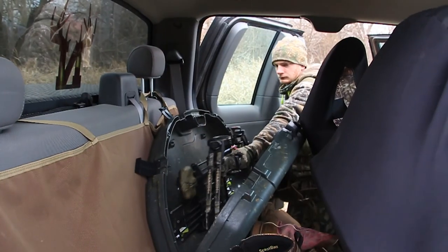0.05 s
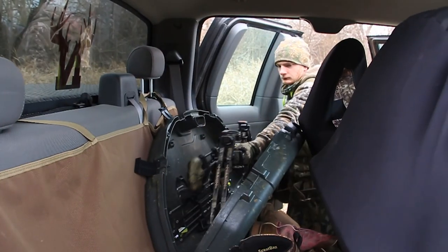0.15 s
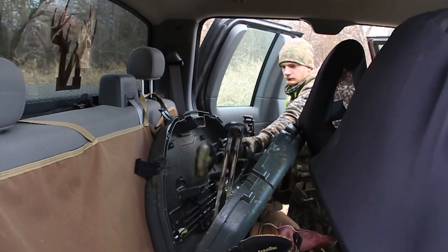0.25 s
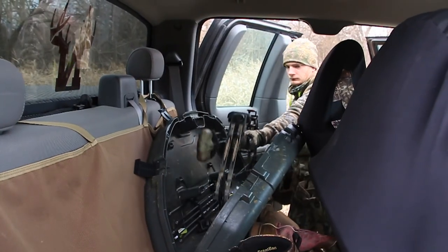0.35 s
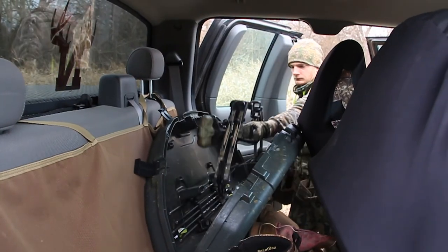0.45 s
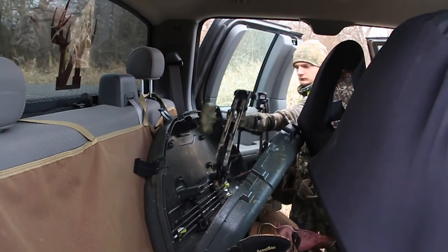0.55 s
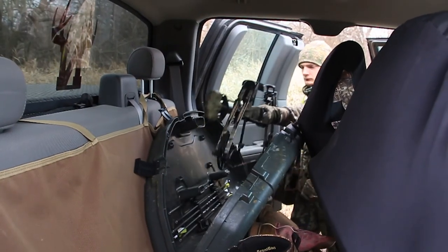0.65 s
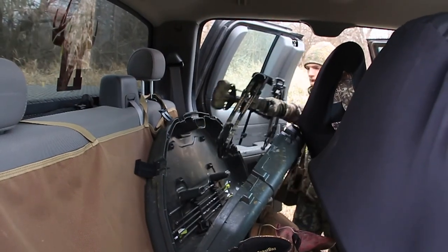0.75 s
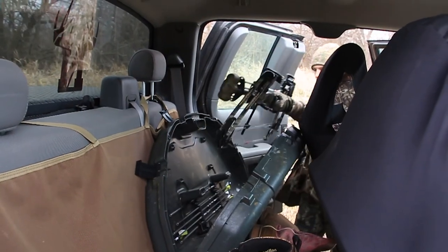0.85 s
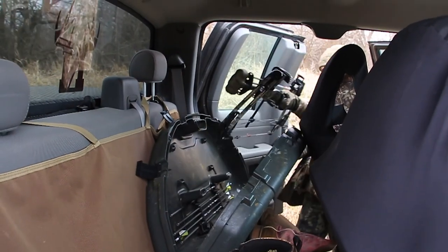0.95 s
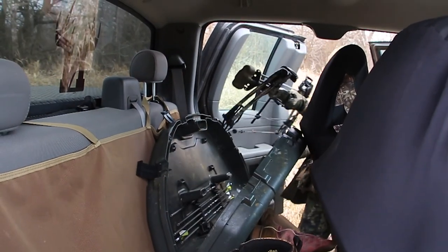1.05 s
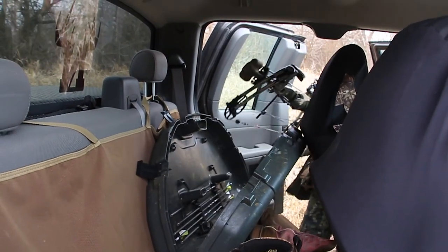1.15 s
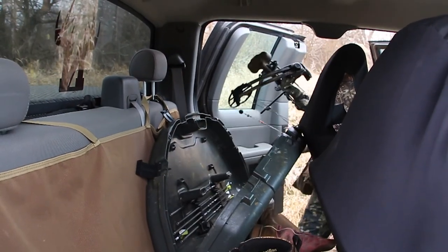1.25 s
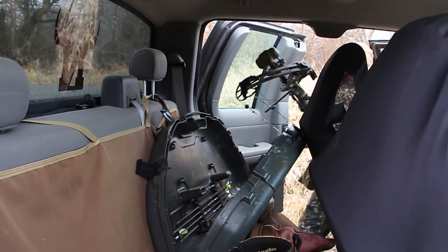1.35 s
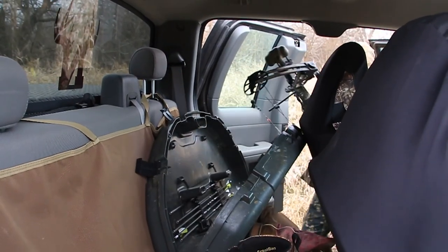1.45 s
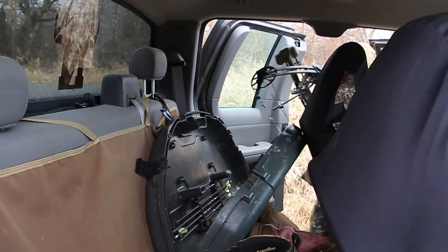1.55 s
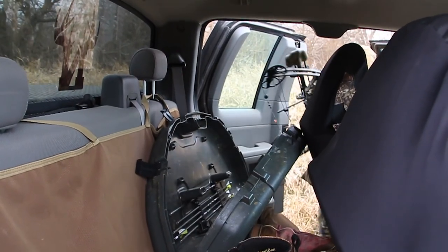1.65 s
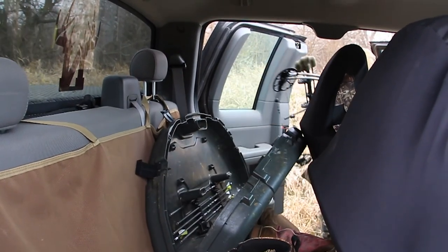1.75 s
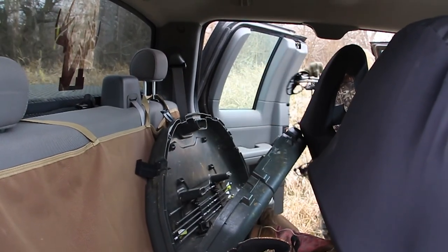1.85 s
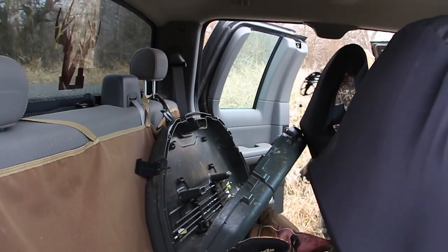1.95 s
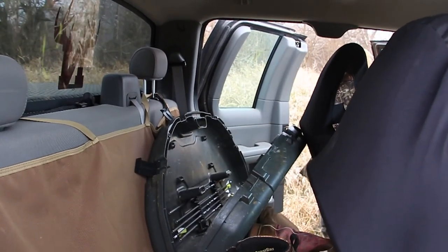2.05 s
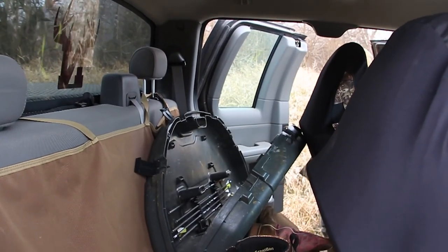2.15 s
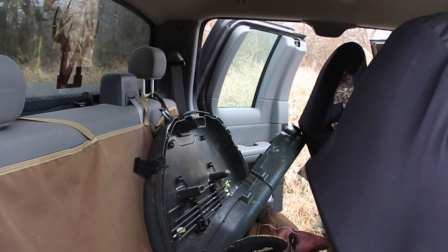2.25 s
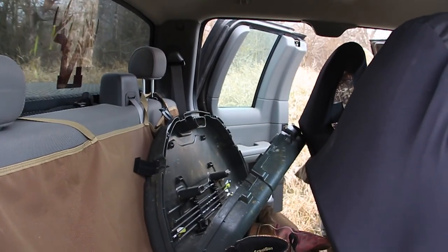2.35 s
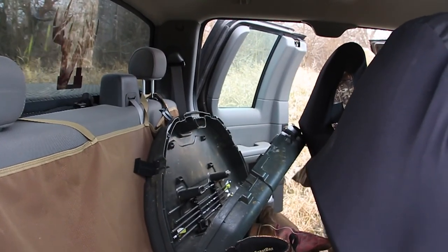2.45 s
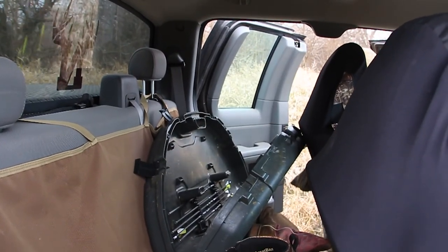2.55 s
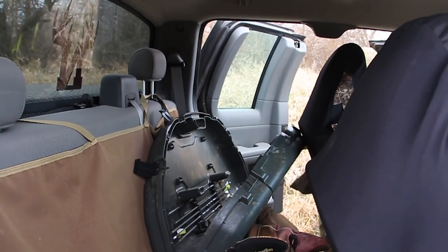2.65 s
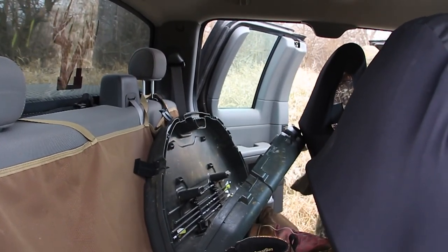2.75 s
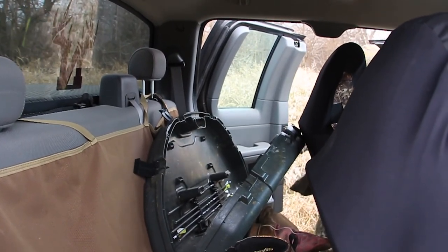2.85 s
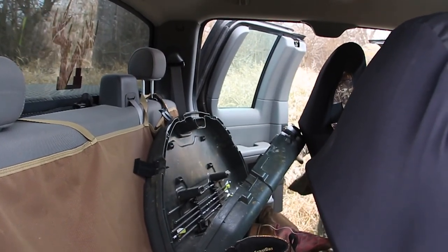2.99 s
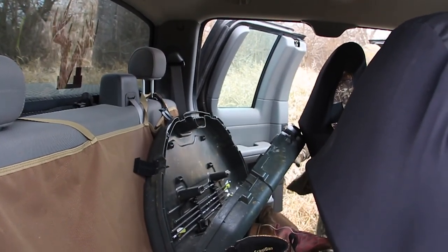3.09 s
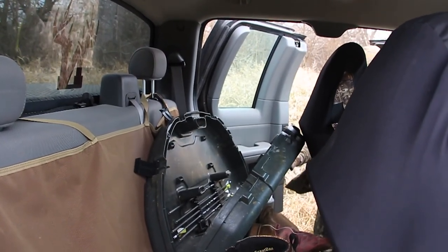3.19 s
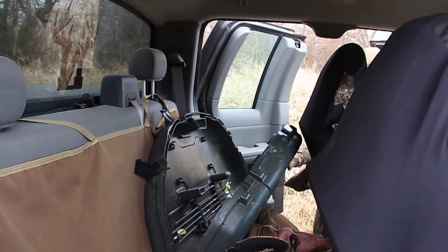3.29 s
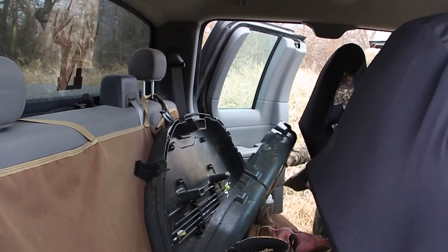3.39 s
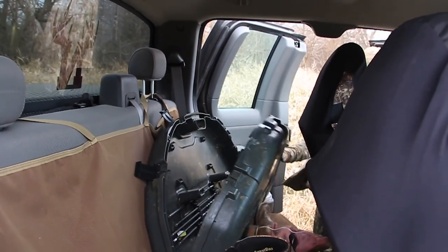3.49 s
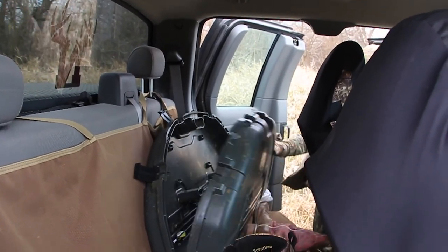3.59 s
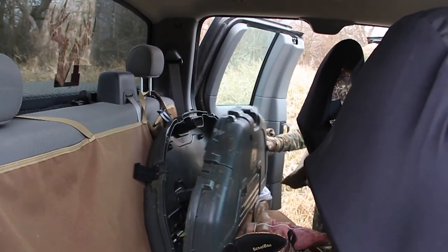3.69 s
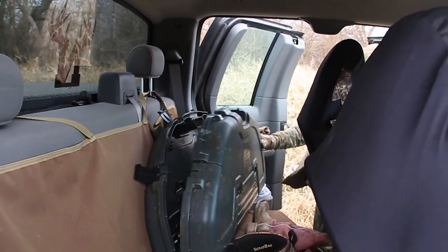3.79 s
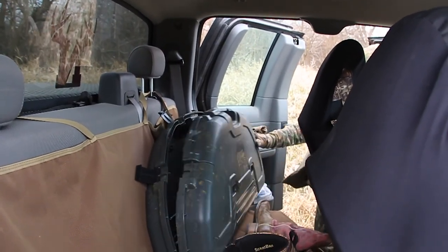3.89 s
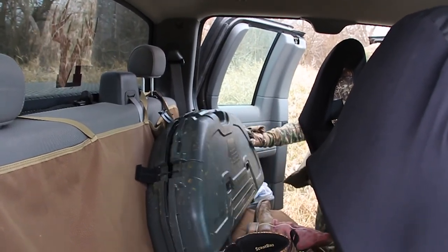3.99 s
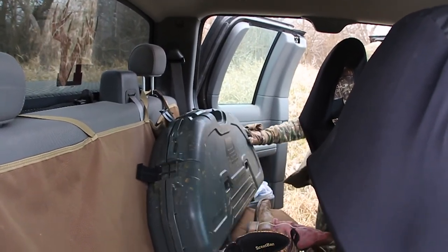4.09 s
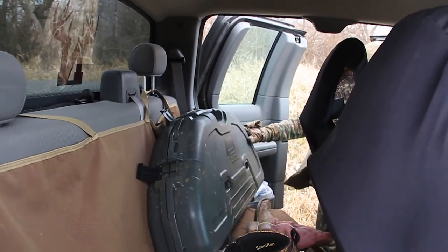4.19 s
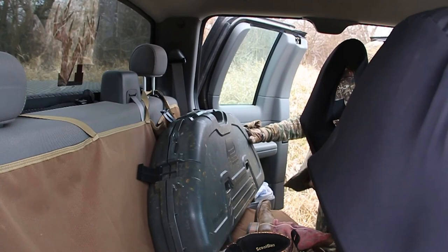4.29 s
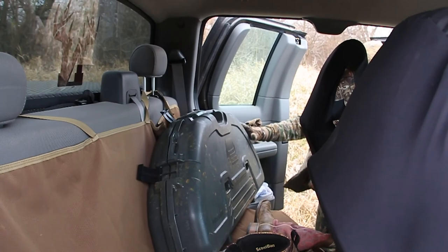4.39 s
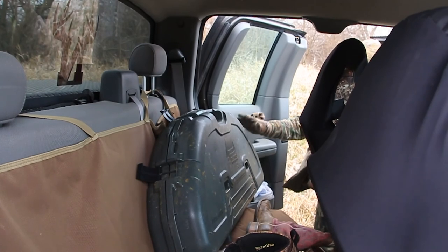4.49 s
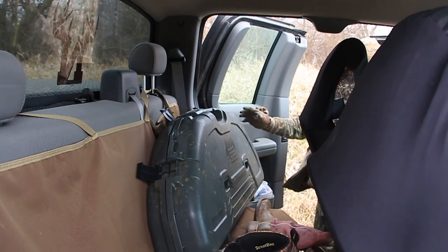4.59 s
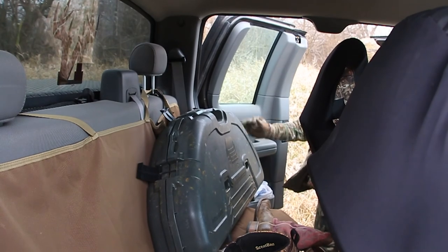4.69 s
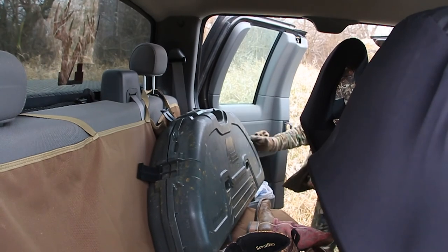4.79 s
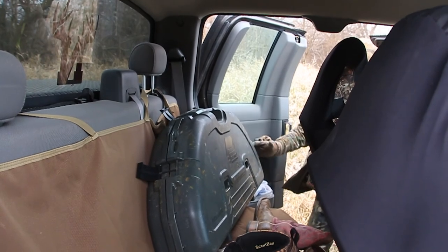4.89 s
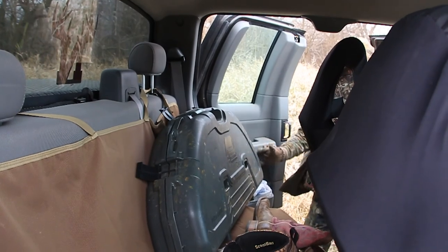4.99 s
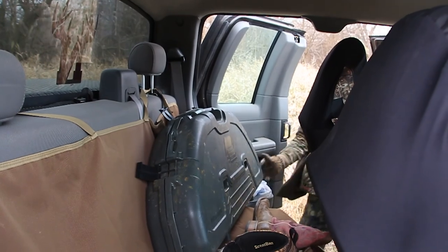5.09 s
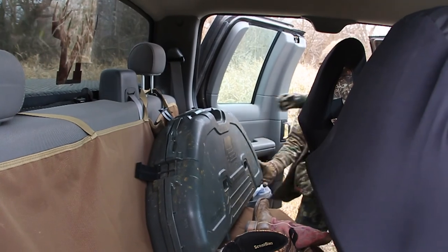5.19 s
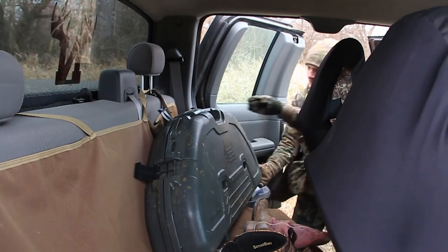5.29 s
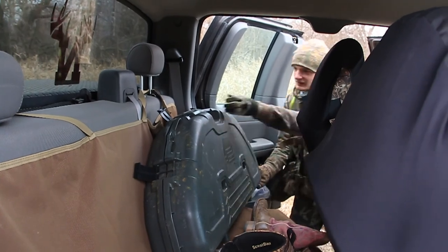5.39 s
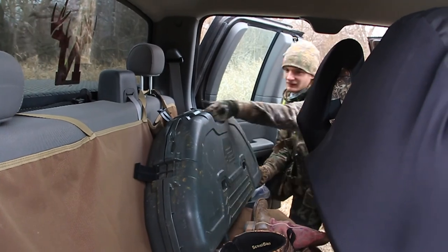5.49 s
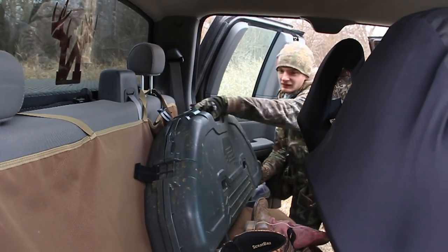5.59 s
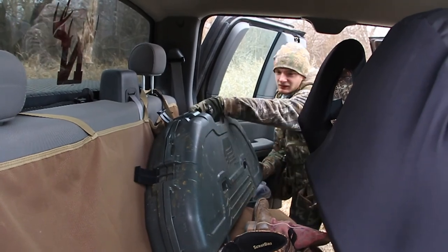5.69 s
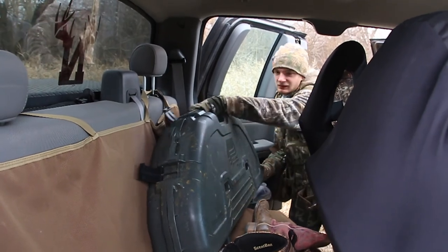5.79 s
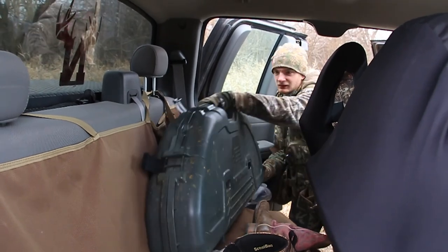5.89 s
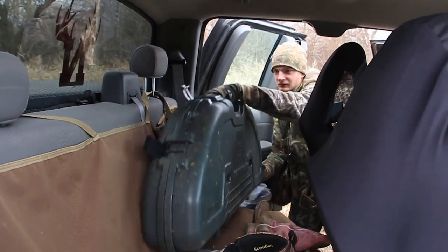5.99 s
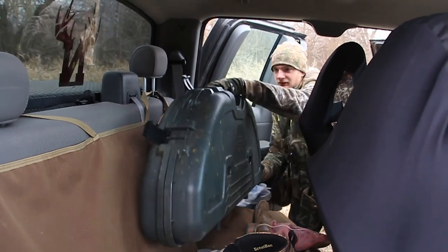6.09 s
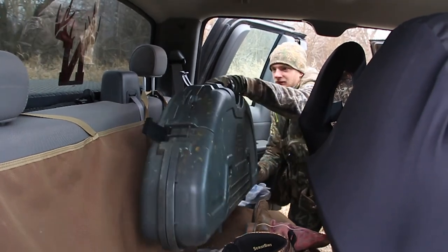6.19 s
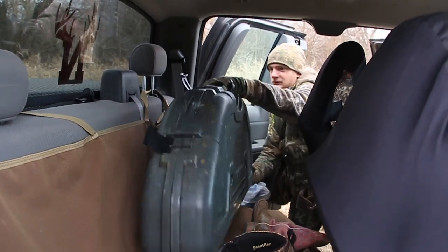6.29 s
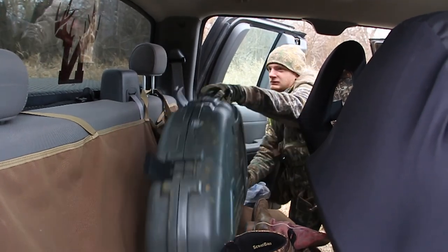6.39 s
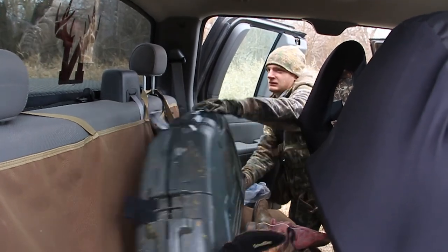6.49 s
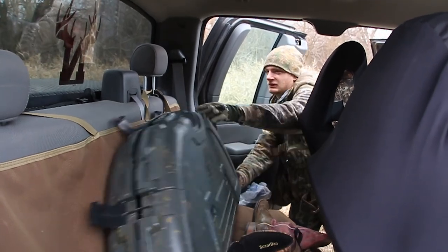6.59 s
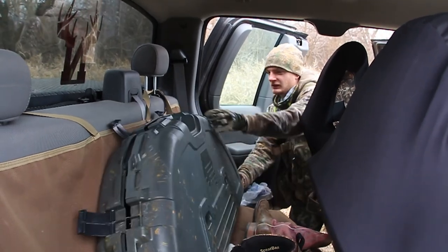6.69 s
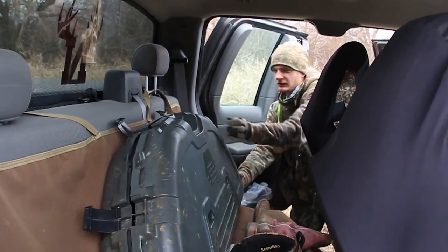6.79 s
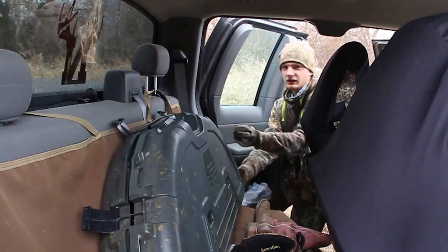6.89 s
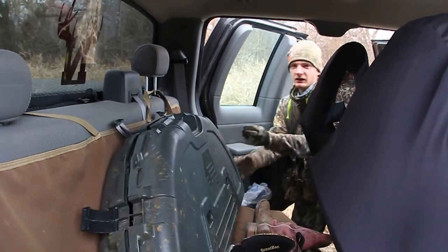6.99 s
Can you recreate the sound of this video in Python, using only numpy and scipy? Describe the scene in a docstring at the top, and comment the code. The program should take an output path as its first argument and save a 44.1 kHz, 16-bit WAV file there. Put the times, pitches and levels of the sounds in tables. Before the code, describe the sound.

Close, centred sound in a small, padded pickup cab, its door open to soft air and low uneven rumble. At 0.2-0.35 s a bow snaps from a hard plastic case with quick hollow clacks, then rattles lightly until about 1.2 s amid rustling clothes. A far bird slurs downward faintly at 0.6-1.5 s; a nearer one gives mostly rising whistles at 0.55, 1.4 and 2.3 s, then louder at 4.2 and 4.8 s. A sleeve brushes softly near 1.7 s and small taps follow. The lid creaks and knocks gently from 3.1 s, slamming hollowly at 4.08 s with a brief boom and thin ring. A latch clicks at 5.3 s. Knocks and sleeve swishes build at 5.5-6.0 s. At 6.45-6.75 s the case is shoved, juddering with a short falling groan and the heaviest thumps; smaller bumps and a short whistle end the scene around 7 s.

```python
"""In a pickup cab with its door open, a bow snaps out of a hard plastic case and rattles free; the lid is
swung shut and latched, and the case is shoved along the seat. Noise bursts ring the hollow shell for knocks;
gritty noise makes sleeves, rubbing and dragging; decaying tones and narrow noise make the rings. Outside, a
bird built of gliding sine partials repeats a mostly rising whistle and a far one slurs down, over filtered
noise for air and rumble."""
import sys
import numpy as np
from scipy import signal
from scipy.fft import rfft, irfft, next_fast_len
from scipy.io import wavfile
from scipy.ndimage import map_coordinates

SR = 44100
rng = np.random.default_rng(int(sys.argv[2]) if len(sys.argv) > 2 else 0)


def dump_mix(stems):
    """Bounce the given channels to the path in sys.argv[1] as a 16-bit WAV at rate SR."""
    frames = np.atleast_2d(stems).T  # one column per channel
    limited = np.clip(frames, -1, 1)  # hard clip at full scale
    pcm = np.round(limited * 32767).astype(np.int16)
    wavfile.write(sys.argv[1], SR, pcm)


N = 310905

# Colour of the open air, relative: freq_hz, density_db (per Hz)
AIR_SPECTRUM = [(12, -22), (20, 5.5), (45, -13), (107, -16.5), (203, -12), (469, -15.5), (797, -25),
                (1150, -24), (2060, -37), (3310, -29.5), (4020, -33), (5170, -30), (7230, -41),
                (14500, -42.5), (15800, -47)]
# Slow swells of the outdoor rumble, before trim and gusts: time_s, level_db
RUMBLE_SWELLS = [(0.0, -45), (0.1, -42), (2.77, -41), (2.85, -36), (3.93, -43), (4.1, -37), (5.65, -46),
                 (5.77, -35), (6.3, -39.5), (6.36, -28), (6.5, -38), (7.05, -37.5)]
# Colour of that rumble, relative: freq_hz, density_db (per Hz)
RUMBLE_SPECTRUM = [(10, -6.0), (22, 4), (38, -5.5), (55, -8.5), (90, -24.5), (300, -77.5)]
# Colour of the faint hiss, relative: freq_hz, density_db (per Hz)
HISS_SPECTRUM = [(100, -7.5), (500, -2.5), (1500, -6), (3000, -10), (7000, -4.5), (15500, -3)]
# Far bird's falling notes, nominal level: start_s, level_db
SLURS = [(.61, -63.5), (.89, -62), (1.15, -63), (1.44, -62)]
# Near bird's calls, before partials and waver:
# start_s, end_s, first_pitch_hz, last_pitch_hz, end_level_db, swell_db (rise over the call), overtone_db
WHISTLES = [(.55, .89, 1560, 1684, -57.5, 5, 0), (1.40, 1.721, 1510, 1690, -49, 13, 0),
            (2.31, 2.565, 1590, 1735, -49, 12, -2), (4.16, 4.269, 1690, 1720, -43, 10, 2),
            (4.78, 5.122, 1490, 1731, -38, 13, -1), (6.761, 6.955, 1565, 1555, -48, 3, 6),
            (6.944, 6.968, 1500, 1480, -40, 0, -5)]
# Partials of its voice: pitch_multiple, level_db, growth (dB per dB of loudness)
SYRINX = [(1, -1, 0), (1.5, -21, 1.5), (2, -1, 0.7), (2.5, -19, 0), (3, -20, 0.5)]
# Decay of the cab's tail: freq_hz, t60_s
CAB_DECAY = [(100, 0.75), (300, 0.29), (1100, 0.21), (4000, 0.3), (12000, 0.04)]
# How busy hands and arms are: time_s, effort_db
EFFORT = [(0, 2.5), (.35, 0.5), (.62, -8), (.9, -15), (1.35, -4.5), (1.8, -11.5), (2.0, -1), (2.3, -7.5),
          (3.1, -1.5), (3.58, 8), (4.1, -2), (4.65, -16.5), (5.2, 0.5), (5.4, 1), (5.85, 9), (6.15, -5),
          (6.6, 10), (7.05, -2)]
# Pushes and pulls that bend and rub the shell: start_s, crest_s, end_s, flexing_db, rubbing_db
BENDS = [(.19, .31, 0.39, -26, -37), (.33, .46, .64, -46, -44), (3.0, 3.26, 3.6, -47, -46),
         (3.7, 3.98, 4.4, -45, -46), (5.0, 5.15, 5.35, -56, -49), (5.45, 5.82, 6.3, -39, -41),
         (6.42, 6.64, 6.844, -27, -38), (6.8, 6.92, 7.4, -41, -52)]
# Colours of bending shell, rubbing hands and rustling clothes, relative: freq_hz, density_db (per Hz)
FLEX_SPECTRUM = [(40, -32.5), (85, 5), (250, 0), (450, -2.5), (800, -18), (2000, -69.5)]
RUB_SPECTRUM = [(300, -24.5), (600, 5.5), (1100, 6.5), (2200, 3), (3500, -1.5), (8000, -35)]
CLOTH_SPECTRUM = [(1180, -29), (2000, -2.5), (2270, -8), (2870, -2.5), (3320, 3.5), (3770, 0), (4290, -0.5),
                  (5400, 1.5), (6580, -4.5), (7420, -8.5), (10600, -11.5), (14200, -18), (15500, -26)]
# Sleeve strokes over the lid: start_s, crest_s, end_s, level_db
SWISHES = [(1.6, 1.71, 1.914, -38), (5.63, 5.75, 5.81, -28), (5.85, 5.995, 6.04, -23.5)]
# The case sliding on the seat: start_s, crest_s, end_s, level_db
SHOVES = [(6.45, 6.468, 6.52, -29), (6.45, 6.52, 6.586, -16.5), (6.56, 6.645, 6.78, -23.5)]
# Colours of sleeve and sliding case, relative: freq_hz, density_db (per Hz)
SLEEVE_SPECTRUM = [(410, 7), (700, 6), (895, 3), (1130, 7), (1540, 2), (1970, 5), (2430, -1.5), (3190, 11),
                   (4030, 5), (5290, 10), (6100, 3), (10900, -4), (15500, -13)]
SLIDE_SPECTRUM = [(47, -7), (80, 11), (155, 2.5), (252, 5.5), (300, -16), (487, -3), (663, -3.5),
                  (1150, 1.5), (1310, 5), (1870, -0.5), (2780, -3), (5380, -2.5), (6280, -10.5),
                  (11100, -16), (15500, -34)]
# Groan of the dragged shell: time_s, pitch_hz, level_db
GROAN = [(6.45, 1160, -35), (6.465, 1144, -34), (6.485, 1158, -30.5), (6.511, 1167, -19), (6.53, 1076, -22),
         (6.56, 1030, -28), (6.58, 970, -46)]
# Bow rattling as it comes free: start_s, crest_s, end_s, level_db
RATTLES = [(.33, .42, 0.59, -43), (.86, .91, 0.98, -41), (.94, .968, 1.005, -36),
           (1.09, 1.115, 1.195, -47.5)]
# Colour of the rattle, relative: freq_hz, density_db (per Hz)
RATTLE_SPECTRUM = [(150, -41), (250, -20), (318, -8), (345, -23), (502, 2.5), (693, -7), (1180, 0.5),
                   (1530, -22), (1940, -17), (3000, -23), (3900, -61), (6600, -120)]
# Bow snapping out of its holders in the open tray: time_s, level_db
RELEASES = [(0.196, -23), (0.205, -26), (0.237, -26), (0.254, -17.5), (0.324, -19)]
# Hollow modes of the open tray, before random spread: freq_hz, level_db, t60_s
TRAY = [(128, -3.5, 0.19), (426, -2.5, 0.094), (730, -0.5, 0.083), (821, 1, 0.085), (932, -8, .07)]
# Latch pressed home: time_s, level_db
LATCH = [(5.321, -27), (5.357, -37.5), (5.397, -42.5)]
# Modes of the latch lever, before random spread: freq_hz, level_db, t60_s
LEVER = [(2330, -13, 0.076), (2610, 5.5, 0.025), (3200, -4, 0.074), (3630, 5.5, 0.036), (4390, -8, 0.1),
         (5400, -17, .1)]
# Thin ring after the lid moves and shuts: time_s, level_db
RINGS = [(3.083, -52.5), (4.08, -48)]
# Cab boom as the lid slams: time_s, level_db
SLAM = [(4.08, -35.5)]
# Damped resonances of the hollow plastic shell: freq_hz, width_hz, level_db
SHELL = [(118.5, 98, 18), (189, 51, 21.5), (263, 82, 16.5), (340.4, 20.4, 12), (399, 78, 11.5),
         (703, 85, 12.5), (814, 72, 9), (917, 36, 8.5), (1117, 52, 5.5), (1390, 39, -5), (1634, 90, 3),
         (1970, 360, -6.5), (2820, 49, 4.5), (3373, 92, 8), (3710, 66, 4), (4020, 140, -2),
         (5030, 240, 2.5), (4890, 46, 3), (5500, 47, -21.5)]
# Blows on the case: time_s, knock_db (before trim), weight_db (added thud),
# softness_db (treble lost per octave), edge_db (added top), panel_hz, t60_s (before each band's linger)
KNOCKS = [(0.193, -27, -2, 2.5, 3, 300, 0.07), (0.203, -28.5, 2.5, 6, 10, 443, .026),
          (0.235, -30, -1, -1, -3, 210, 0.044), (0.251, -22.5, 2, 7, 6, 430, 0.076),
          (0.322, -20.5, -4.5, 2, 6, 420, 0.026), (0.956, -46, -2, 10, 6, 506, .09),
          (1.914, -50, -3, .5, -10, 191, .035), (2.763, -48, -16, 11, 8, 172, .055),
          (2.817, -52, -18, -2.5, -12, 417, .13), (3.083, -53, 17, 2, -2, 170, .08),
          (3.124, -49, -3, -.5, 0, 178, 0.054), (3.258, -38.5, 0, 6, -9, 220, 0.11),
          (3.283, -45, 6, 2.5, -3, 330, 0.15), (3.347, -39, -20, -4.5, -10, 458, .1),
          (3.93, -35.5, -1, 1.5, -11, 187, 0.16), (4.073, -24.5, 5.5, -.5, -22, 388, .033),
          (4.08, -19, 5, 10, 6, 260, .021), (4.169, -47, 5.5, -2.5, -17, 260, 0.1),
          (4.812, -56.5, 13, 2.5, -4, 245, .075), (4.923, -65.5, 28, 3, 0, 216, .03),
          (5.288, -51, -2, -7.5, -27, 205, .04), (5.318, -32, 9, 6, -12, 300, .14),
          (5.404, -41, 11.5, 10, 0, 261, .075), (5.527, -40.5, -12, -1, -17, 506, 0.1),
          (5.579, -45.5, 15, 2, -2, 198, 0.097), (5.612, -40.5, 5, -1, -7, 300, 0.07),
          (5.835, -52, 27, 1, -3, 212, .03), (6.004, -37.5, 10.5, 5, 15, 320, .05),
          (6.277, -36, -10, 6.5, 0, 256, 0.098), (6.329, -48, 19, 4, -8, 194, 0.054),
          (6.518, -21.5, -1, 7.5, -8, 173, .02), (6.53, -28, 9.5, 3.5, -10, 205, .05),
          (6.544, -39, 16, 1.5, -8, 290, 0.14), (6.627, -26.5, -2, 13, 18, 172, 0.053),
          (6.658, -15, -4, 11, 3, 363, 0.032), (6.726, -36, 0, 3.5, 1, 172, 0.11),
          (6.854, -43, 9.5, 8, 8, 300, 0.031), (6.887, -32, 10.5, 14, 18, 288, .07),
          (6.944, -45, 9, 7.5, 10, 320.6, .045)]
# Light taps of fingers and fittings: time_s, knock_db (before trim)
TAPS = [(1.097, -53), (1.94, -52), (2.018, -51), (2.473, -55), (2.7, -54), (2.905, -54), (3.325, -48),
        (3.393, -48), (5.16, -47), (5.455, -50)]
# What all taps share: weight_db, softness_db (per octave), edge_db, panel_hz, t60_s
TAP = (-3, 1, -8, 230, .055)
# Bands of a contact, rising as boom, thud, knock, crack, snap: low_hz, high_hz
CONTACT_BANDS = [(85, 190), (190, 560), (650, 2100), (2300, 6200), (6200, 13500)]
# Decay time of each band, as a multiple of the blow's t60
LINGER = (1.6, 1.2, .85, .62, .58)


def amp(db):
    """Decibels to gain."""
    return 10 ** (np.asarray(db) / 20)


def unit(x):
    """Scale to rms 1."""
    return x / np.sqrt(np.mean(x ** 2) + 1e-20)


def along(points, hz):
    """Join (freq_hz, value) points on a log frequency axis."""
    point_hz, values = np.transpose(points)
    return np.interp(np.log(hz + 1), np.log(point_hz + 1), values)


def curves(rows):
    """Draw one curve over the scene for each column after the time."""
    times, *columns = np.transpose(rows)
    t = np.arange(N) / SR
    return [np.interp(t, times, column) for column in columns]


def wobble(rate_hz, size=N):
    """A smooth random curve with rate_hz knots a second."""
    knots = rng.standard_normal(int(size * rate_hz / SR) + 4)
    return map_coordinates(knots, [np.arange(size) * rate_hz / SR])


def filtered(x, response):
    """Shape x by a complex response of frequency."""
    length = x.shape[-1]
    padded = next_fast_len(length + SR // 4)
    hz = np.fft.rfftfreq(padded, 1 / SR)
    return irfft(rfft(x, padded) * response(hz), padded)[..., :length]


def coloured(x, spectrum):
    """Give x a spectral colour, at rms 1."""
    return unit(filtered(x, lambda hz: amp(along(spectrum, hz))))


def friction(grain_rate_hz, grain_db):
    """Noise of randomly varying strength, like tiny slips of uneven size."""
    return unit(rng.standard_normal(N) * amp(grain_db * wobble(grain_rate_hz)))


def strokes(rows, depth_db):
    """Gains that swell from depth_db below each crest and die away again."""
    t, gain = np.arange(N) / SR, np.zeros(N)
    for start, crest, end, level_db in rows:
        corners_s = [start - .01, start, crest, end, end + .01]
        shape_db = np.interp(t, corners_s, [-120, -depth_db, 0, -depth_db, -120])
        gain += amp(level_db + shape_db)
    return gain


def resonance(rows, width_hz):
    """One resonance, driven by smooth random curves, that follows (time_s, pitch_hz, level_db) rows."""
    hz, level_db = curves(rows)
    t = np.arange(N) / SR
    drive = wobble(width_hz) + 1j * wobble(width_hz)
    tone = np.real(drive * np.exp(2j * np.pi * np.cumsum(hz) / SR))
    return unit(tone) * amp(level_db) * (t > rows[0][0]) * (t < rows[-1][0])


def shell(x):
    """The direct sound plus the case's damped resonances, each a second-order bandpass."""
    def response(hz):
        total = 1
        for centre, width, level_db in SHELL:
            damping = 1j * hz * width
            total = total + amp(level_db) * damping / (centre ** 2 - hz ** 2 + damping)
        return total
    return filtered(x, response)


def outdoors(air_db=-50.5, rumble_trim_db=1, gust_db=1.2):
    """Open air through the door: a soft noise wash and a deep, uneven rumble."""
    rumble_db, = curves(RUMBLE_SWELLS)
    rumble_gain = amp(rumble_db + rumble_trim_db + gust_db * wobble(5))
    rumble = rumble_gain * coloured(rng.standard_normal(N), RUMBLE_SPECTRUM)
    return rumble + amp(air_db) * coloured(rng.standard_normal(N), AIR_SPECTRUM)


def cab(x):
    """The upholstered cab as a short noise tail with its own decay in each band."""
    hz, t, noise = signal.stft(rng.standard_normal(SR // 2), SR, nperseg=256)
    decay = amp(-60 * t / along(CAB_DECAY, hz)[:, None])
    tail = signal.istft(noise * decay, SR, nperseg=256)[1]
    return signal.fftconvolve(x, tail / np.linalg.norm(tail))[:N]


def far_bird(start_hz=2500, end_hz=1830, note_s=.075, blur_hz=130):
    """Short falling, swelling notes, blurred by distance."""
    notes = np.zeros(N)
    for start, level_db in SLURS:
        glide = [(start, start_hz, level_db - 3), (start + note_s, end_hz, level_db + 4)]
        notes += resonance(glide, blur_hz)
    return notes + .5 * cab(notes)


def bird(waver=0.0018, flutter_db=1.7, uneven_db=2.5, loud_db=-40):
    """Sine partials glide, swell and drop at the end of each whistle; louder notes are richer."""
    drop_s, drop_share, fade_s = .018, .07, .01  # quick fall in pitch at the end of each call
    step_s, step_share = .1, .011  # the pitch moves in small waves
    t, out = np.arange(N) / SR, np.zeros(N)
    drift = 1 + waver * wobble(90)
    for start, end, first_hz, last_hz, end_db, swell_db, bright_db in WHISTLES:
        on = (t > start) & (t < end)
        since, left = t[on] - start, end - t[on]
        pitch_hz = np.interp(t[on], [start, end - drop_s, end],
                             [first_hz, last_hz, last_hz * (1 - drop_share)])
        pitch_hz = pitch_hz * (1 - step_share * np.cos(2 * np.pi * left / step_s))
        phase = 2 * np.pi * np.cumsum(pitch_hz * drift[on]) / SR
        call_db = end_db - swell_db * left / (end - start)
        gate = np.clip(np.minimum(since, left) / fade_s, 0, 1)
        for multiple, level_db, growth in SYRINX:
            overtone_db = (multiple > 1) * (bright_db + uneven_db * wobble(20, size=len(call_db)))
            partial_db = call_db + level_db + growth * (call_db - loud_db) + overtone_db
            out[on] += gate * np.sqrt(2) * amp(partial_db) * np.sin(multiple * phase)
    return out * amp(flutter_db * wobble(35))


def handling():
    """One effort drives it all: hands flex and rub the shell, clothing rustles, pushes swell above that."""
    effort_db, = curves(EFFORT)
    # level at zero effort, then dB gained per dB of effort
    flex_gain = amp(-55 + .7 * effort_db)
    rub_gain = amp(-52 + .6 * effort_db)
    cloth_gain = amp(-50.5 + 1.0 * effort_db)
    flex_pushes = [(*times, flex_db) for *times, flex_db, rub_db in BENDS]
    rub_pushes = [(*times, rub_db) for *times, flex_db, rub_db in BENDS]
    flex_gain = flex_gain + strokes(flex_pushes, depth_db=17.5)
    rub_gain = np.hypot(rub_gain, strokes(rub_pushes, depth_db=14))
    flex_noise = shell(friction(grain_rate_hz=29, grain_db=3.0))
    rub_noise = friction(grain_rate_hz=56, grain_db=1.5) + 0.08 * shell(rng.standard_normal(N))
    cloth_noise = friction(grain_rate_hz=160, grain_db=1.5)
    flex = flex_gain * coloured(flex_noise, FLEX_SPECTRUM)
    rub = rub_gain * coloured(rub_noise, RUB_SPECTRUM)
    return flex + rub + cloth_gain * coloured(cloth_noise, CLOTH_SPECTRUM)


def sliding():
    """Gritty noise for sleeves on the textured lid and the juddering case, with a gliding groan."""
    sleeve_noise = friction(grain_rate_hz=150, grain_db=1.0)
    sleeve = strokes(SWISHES, depth_db=20) * coloured(sleeve_noise, SLEEVE_SPECTRUM)
    slips = friction(grain_rate_hz=220, grain_db=1.5)
    drag = strokes(SHOVES, depth_db=20.5) * coloured(slips + 0.21 * shell(slips), SLIDE_SPECTRUM)
    return sleeve + drag + resonance(GROAN, width_hz=380)


def bow():
    """Loose parts of the bow chatter against the shell: coarse noise through its resonances."""
    chatter = shell(friction(grain_rate_hz=160, grain_db=4.5))
    return strokes(RATTLES, depth_db=18) * coloured(chatter, RATTLE_SPECTRUM)


def struck(blows, modes):
    """A stiff part rings in decaying sine modes, at new strengths for each blow."""
    out, t = np.zeros(N), np.arange(SR // 4) / SR
    onset = 1 - np.exp(-t / 0.00078)
    for start, blow_db in blows:
        ring = np.zeros(len(t))
        for hz, mode_db, t60 in modes:
            decay_db = mode_db + rng.normal(0, 1.9) - 60 * t / t60
            ring += amp(decay_db) * np.sin(2 * np.pi * hz * t)
        out[round(start * SR):][:len(t)] += amp(blow_db) * ring * onset
    return out


def afterring(blows, hz, length_s, width_hz):
    """A blurred resonance falls 62 dB over its length after each blow."""
    out = np.zeros(N)
    for start, level_db in blows:
        out += resonance([(start, hz, level_db), (start + length_s, hz, level_db - 62)], width_hz)
    return out


def contacts():
    """All blows and taps as rows of the same columns."""
    return KNOCKS + [(start, knock_db, *TAP) for start, knock_db in TAPS]


def contact_levels(knock_db, weight_db, softness_db, edge_db, panel_hz):
    """Level of each band: weight adds thud, softness takes treble away, bigger and lower panels boom more."""
    knock_trim_db, crack_db, snap_db = 0.9, 1.2, -5  # crack and snap as for a fully hard contact
    big_panel_hz, boom_trim_db, boom_db_per_octave = 180, -2, -8
    octaves = np.log2(CONTACT_BANDS).mean(axis=1)
    crack_octaves, snap_octaves = octaves[-2:] - octaves[2]
    boom_db = weight_db + boom_trim_db + boom_db_per_octave * np.log2(panel_hz / big_panel_hz)
    crack_db = crack_db - softness_db * crack_octaves
    snap_db = snap_db + edge_db - softness_db * snap_octaves
    return knock_db + np.array([boom_db, weight_db, knock_trim_db, crack_db, snap_db])


def knocks(chatter_db=-22, chatter_t60_s=0.086, graze_db=-18, panel_q=3.8, panel_db=8,
           push_db=15, soft_seating_s=0.0057, hard_seating_s=.0018):
    """A contact grazes, then bites: a push and a burst of micro-impacts ring the shell."""
    lead = SR // 100  # samples of grazing before the bite
    out, t = np.zeros(N + SR), (np.arange(SR // 4) - lead) / SR
    early = (t > 0) & (t < .03)  # levels hold over this first stretch
    age = np.maximum(t, 0)
    body = shell(signal.unit_impulse(len(t)))
    filters = []
    for band in CONTACT_BANDS:
        order = 2 if band[0] < 500 else 4
        filters.append(signal.butter(order, band, "bandpass", fs=SR, output="sos"))
    for start, knock_db, weight_db, softness_db, edge_db, panel_hz, t60 in contacts():
        band_db = contact_levels(knock_db, weight_db, softness_db, edge_db, panel_hz)
        # gentle contacts build up more slowly
        seating_s = np.interp(band_db.max(), [-42, -25], [soft_seating_s, hard_seating_s])
        bite = amp(graze_db * np.maximum(-t / seating_s, 0))
        decay = amp(-60 * age / (t60 * np.array(LINGER)[:, None]))
        decay = decay + amp(chatter_db - 60 * age / chatter_t60_s)
        force = rng.standard_normal(len(t)) * bite * decay
        force[:3, lead] += amp(push_db)  # the blunt push carries no treble
        bursts = signal.fftconvolve(force, body[None], axes=1)[:, :len(t)]
        # the panel that is touched colours the thud
        peak_b, peak_a = signal.iirpeak(panel_hz, panel_q, SR)
        bursts[1] += amp(panel_db) * signal.lfilter(peak_b, peak_a, bursts[1])
        first = round((start + hard_seating_s) * SR) - lead
        for burst, sos, level_db in zip(bursts, filters, band_db):
            part = signal.sosfilt(sos, burst)
            out[first:][:len(t)] += amp(level_db) * part / np.std(part[early])
    return out[:N]


def scene(cab_db=-20, hiss_db=-56):
    """Everything sits in the centre; only a faint hiss differs between the channels."""
    background = outdoors() + far_bird()
    rings = struck(RELEASES, TRAY) + struck(LATCH, LEVER)
    thin_ring = afterring(RINGS, hz=1128, length_s=1.6, width_hz=80)
    slam_boom = afterring(SLAM, hz=73, length_s=1.17, width_hz=35)
    near = bird() + sliding() + bow() + rings + thin_ring + slam_boom + knocks()
    mono = background + handling() + near + amp(cab_db) * cab(near)
    hiss = np.array([coloured(rng.standard_normal(N), HISS_SPECTRUM) for channel in "LR"])
    return mono + amp(hiss_db) * hiss


def record(dry):
    """Soft saturation rounds off the loudest peaks, then a steep low-pass removes the very top."""
    ceiling, top_hz = .95, 15750
    clipped = dry / (1 + np.abs(dry / ceiling) ** 6) ** (1 / 6)
    return filtered(clipped, lambda hz: hz < top_hz)


dry = scene()
out = record(dry)
dump_mix(out)
```